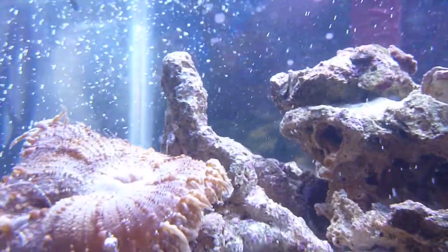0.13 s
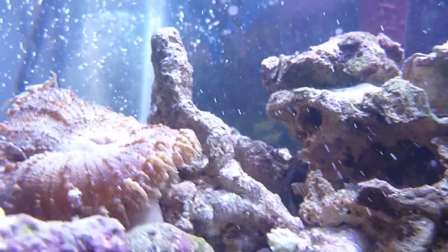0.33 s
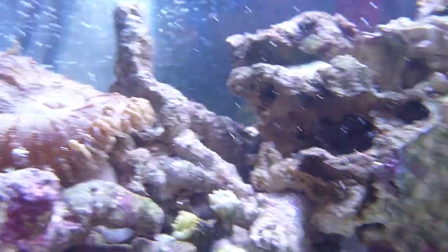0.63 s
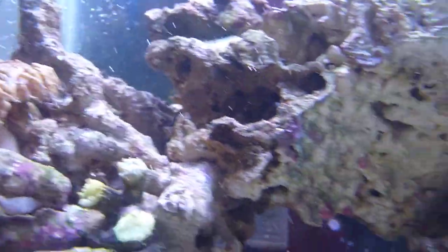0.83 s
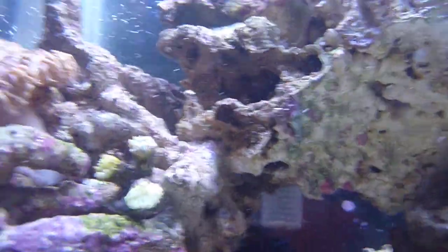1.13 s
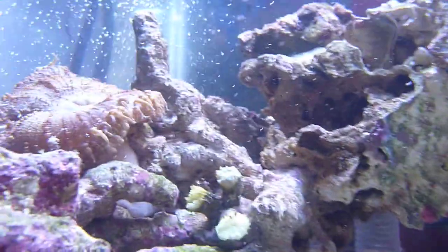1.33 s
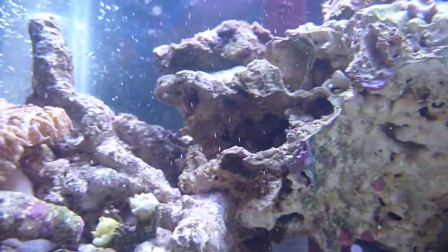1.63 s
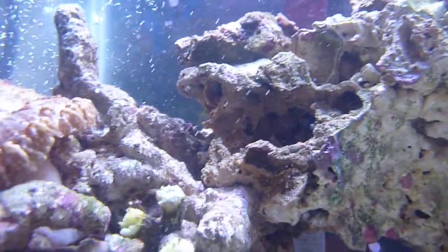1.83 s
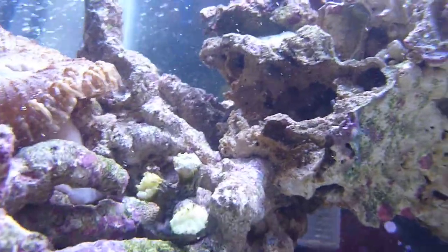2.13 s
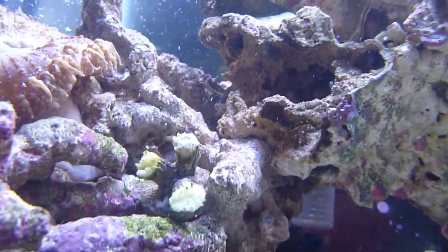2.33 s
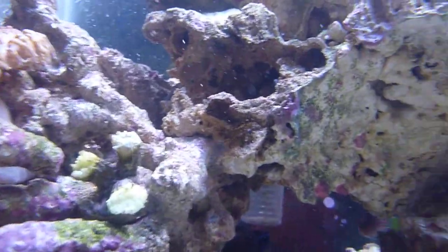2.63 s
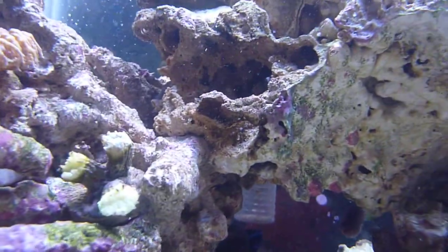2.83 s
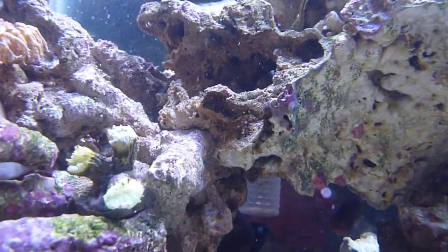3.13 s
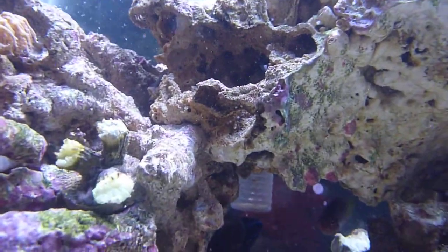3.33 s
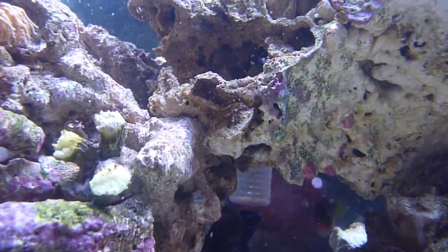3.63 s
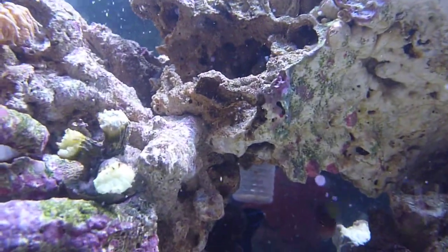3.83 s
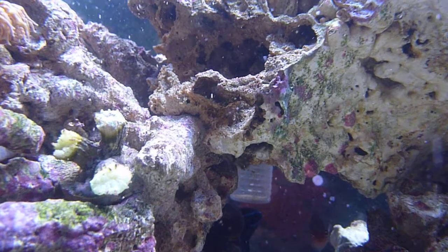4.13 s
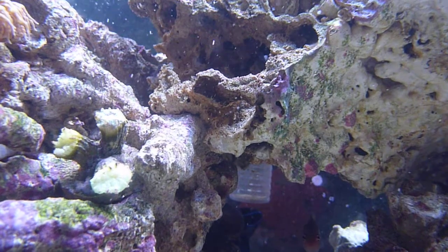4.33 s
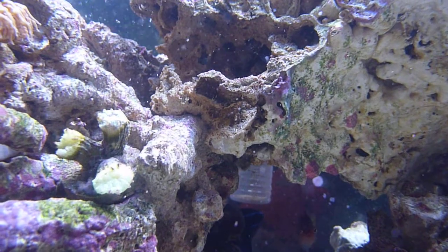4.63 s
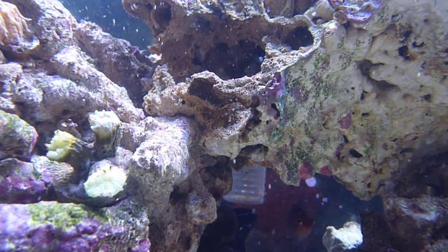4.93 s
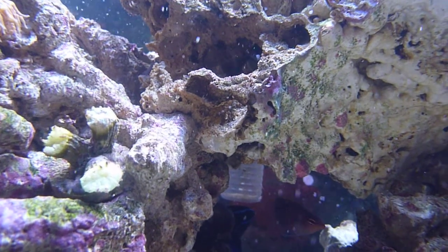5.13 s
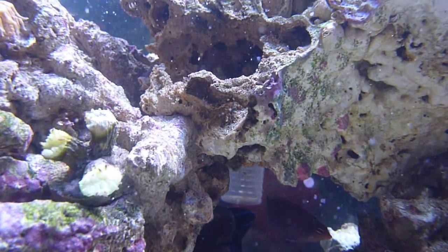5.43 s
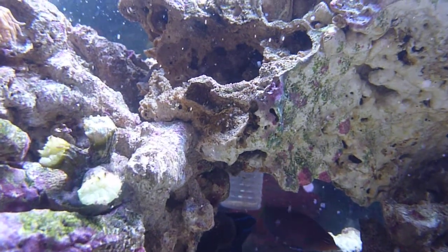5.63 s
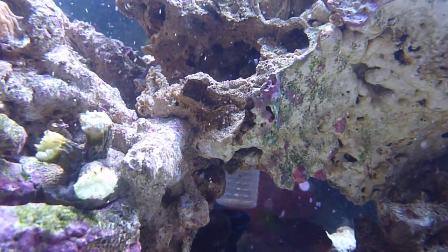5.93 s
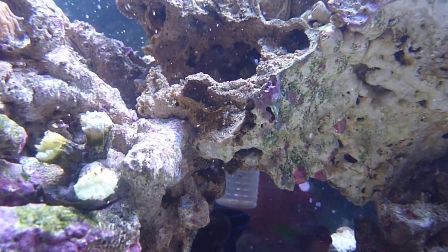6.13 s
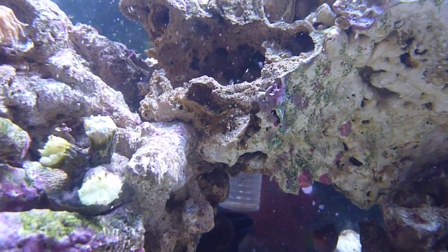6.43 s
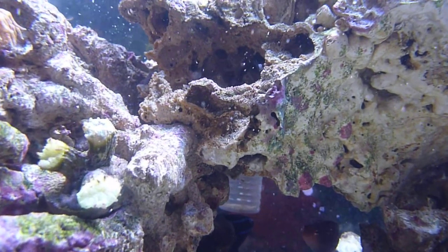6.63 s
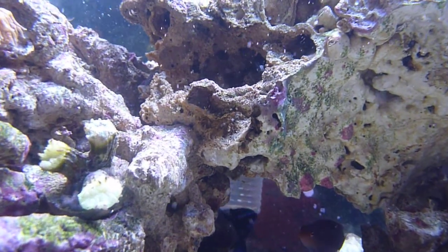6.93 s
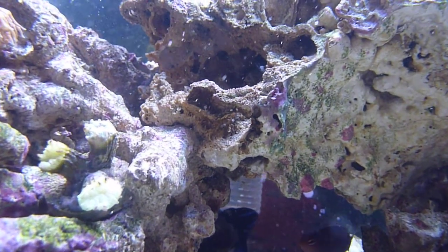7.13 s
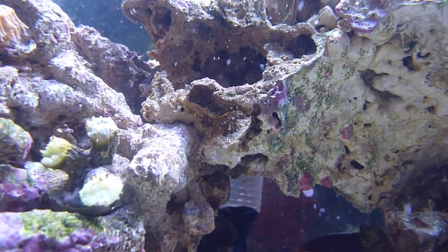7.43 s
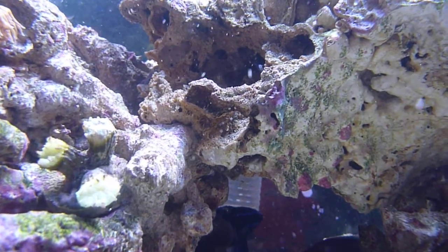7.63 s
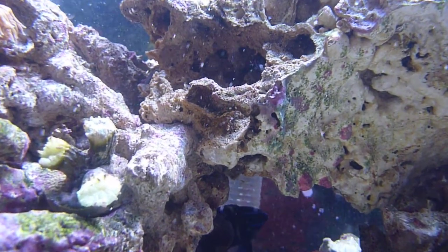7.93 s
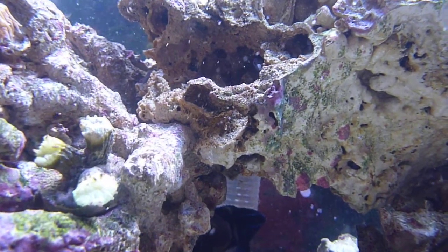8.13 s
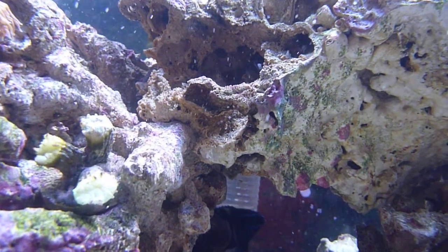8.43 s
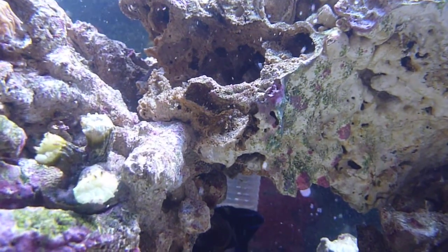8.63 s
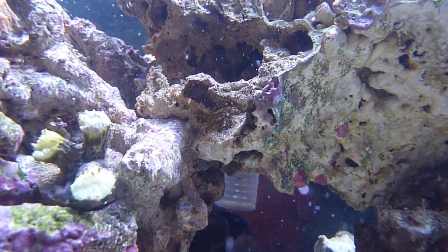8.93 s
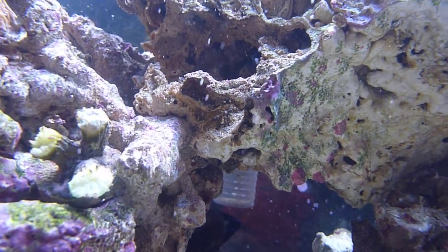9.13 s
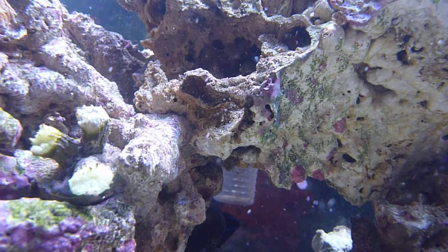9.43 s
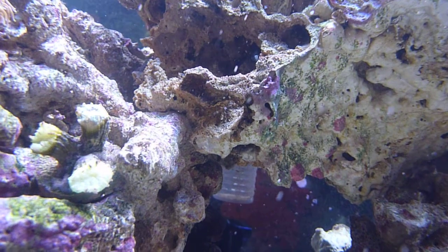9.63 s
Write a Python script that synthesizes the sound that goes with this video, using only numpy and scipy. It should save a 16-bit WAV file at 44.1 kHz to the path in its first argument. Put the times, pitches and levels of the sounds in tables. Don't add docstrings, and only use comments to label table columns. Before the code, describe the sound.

Throughout about 9.8 seconds, bubbles gurgle close by in a drain pipe: dense, wet fizzing around one to two and a half kilohertz, a hollow resonance wandering in pitch, and short rounded plops, strongest near 3.9, 4.3, 6.45 and 9.5. Pumps hum low and steadily beneath a soft, dull wash. From 0 to 2.7 a tiny lens motor whirrs in fast fluttering pulses, winds down in six quick twitches until about 3.1, then twitches grittily at irregular intervals from 3.6. A palm rubs until 1.6; fingers knock at 0.6, then harder with piercing clicks at 1.05 to 1.3. A lone hard knock lands at 2.5, a faint slide at 3.3, two knocks at 6.0 and 6.2, and one at 8.5. Tiny bright ticks are scattered throughout. The sealed microphone sounds close and muffled; loud hits briefly duck everything.

```python
import sys
import numpy as np
from scipy import signal
from scipy.fft import rfft, irfft
from scipy.io import wavfile
from scipy.ndimage import uniform_filter1d

SR = 44100
rng = np.random.default_rng(int(sys.argv[2]) if len(sys.argv) > 2 else 0)


def wav_record(signal):
    frames = np.transpose(np.atleast_2d(signal))
    bounded = np.clip(frames, -1, 1)
    quanta = np.round(bounded * 32767).astype(np.int16)
    wavfile.write(sys.argv[1], SR, quanta)


def nominal_scale(level):
    x = np.asarray(level, float) / 20
    return 10 ** x


N = 430857
LENGTH_S = N / SR
TIME = np.arange(N) / SR

# [t/s, peak level/dB, f/Hz]
LARGE_BUBBLES = [(0.0463, -20, 1710), (0.4242, -22, 1235), (0.5448, -20.5, 1325), (0.5713, -19.5, 1430),
                 (0.6419, -13.5, 1397), (2.0496, -12, 1820), (2.0508, -10, 1807), (2.092, -21.5, 1285),
                 (2.1958, -24.5, 1810), (2.1981, -11, 1696), (2.8346, -28, 1280), (3.9094, -17.5, 1620),
                 (3.9127, -5, 1660), (4.0499, -18.5, 1696), (5.2913, -16, 1595), (0.16, -20, 1550),
                 (6.0511, -12, 1720), (6.0532, -19.5, 1960), (6.4285, -20, 1660), (6.4557, -13.5, 1797),
                 (6.4571, -4.5, 1787), (6.948, -9.5, 1444), (7.2294, -13, 1505), (7.98, -20.5, 1580),
                 (8.6077, -16, 1270), (8.6334, -17.5, 1740), (8.7293, -15.5, 1765), (9.0274, -18, 1760),
                 (9.0351, -10.5, 1670), (9.5434, -20.5, 1490),
                 (0.328, -12.5, 1867), (0.6508, -18.5, 2100), (1.501, -18, 2370), (1.5175, -13, 2260),
                (2.0185, -16.5, 2270), (2.6237, -17, 1880), (2.8337, -19.5, 2090), (3.1124, -9.5, 2410),
                (3.1567, -16.5, 2440), (3.5326, -14, 1920), (3.6337, -14.5, 2164), (4.179, -18, 2160),
                (4.2627, -14.5, 2170), (4.288, -6, 1900), (5.1424, -15.5, 2154), (5.1681, -15.5, 2520),
                (5.2937, -7.5, 1940), (5.7507, -12.5, 2064), (5.9082, -15.5, 2390), (6.01, -12, 1965),
                (6.99, -12, 2235), (7.088, -16, 2154), (7.387, -18.5, 1910), (7.755, -19, 1990),
                (8.297, -16.5, 2360), (8.607, -15.5, 2050), (8.7306, -12, 1970), (9.3895, -16.5, 1980),
                (9.5408, -6.5, 2000), (9.6764, -15, 2410)]
TRAINS, TRAIN_GAP_S, TRAIN_STEP_HZ = 55, 0.018, 160
MIDDLING_DB, MIDDLING_SPREAD_DB, MIDDLING_LOW_HZ, MIDDLING_HIGH_HZ = -23.5, 2.5, 1208, 2590
TINY_COUNT, TINY_DB, TINY_LOW_HZ = 45, -52, 2900

# [t/s, f/Hz]
AIR_COLUMN = [(0, 1242), (.5, 1227), (.8, 1433), (1.25, 1263), (2.75, 1340), (3.05, 1201), (4.0, 1380),
              (4.4, 1089), (5.2, 1402), (5.7, 1261), (6.05, 1426), (6.55, 1335), (7.25, 1175), (7.55, 1302),
              (8.25, 1132), (8.5, 1255), (9.45, 1071), (9.77, 1197)]
# [t/s, level/dB]
GURGLE_LEVEL = [(0.0, -38.5), (0.65, -30.5), (1.03, -37), (2.56, -36.5), (2.75, -32.5), (3.15, -40),
                (3.56, -32.5), (4.57, -38.5), (5.22, -34.5), (5.44, -40.5), (6.17, -33.5), (6.61, -33.5),
                (7.48, -40.5), (7.94, -34.5), (8.22, -42), (8.82, -35), (9.77, -37.5)]
# [f/Hz, level/dB per Hz]
FIZZ_SPECTRUM = [(530, -47), (900, -17.5), (1280, -17.5), (1560, -11), (1700, -3.5), (1970, 0.5),
                 (2450, -4), (2930, -17), (3400, -46), (4420, -72), (7480, -120)]
FIZZ_PITCHES, COLUMN_T60_S = 36, 0.055
WHINE_HZ, WHINE_DB = 2991, -73

# [multiple of step rate, level going out/dB, level coming back/dB]
WHIRR = [(1, -50, -50.5), (2, -42, -49.5), (3, -50, -40.5), (4, -53.5, -45), (6, -59.5, -85.5),
         (7, -74.5, -64.5)]
# [f/Hz, level/dB per Hz]
GEAR_SPECTRUM = [(400, -4), (700, -13), (900, 0.5), (1300, 0), (2400, 0.5), (3200, -26), (5000, -29.5),
                 (7500, -41)]
FRAME_S, STEP_HZ, HUNT_END_S = 1 / 29.97, 479.2, 2.72
WIND_DOWN_S, WIND_DOWN_GAP_S, WIND_DOWN_DB = 2.733, 0.057, -43
FULL_DB, FULL_LENGTH_S, LIGHT_LENGTH_S = -41, 0.039, 0.028
FULL_TWITCHES = [3.563, 3.642, 3.764, 3.832, 4.387, 4.602, 4.711, 4.908, 5.046, 5.133, 5.277, 5.386, 5.582,
                 5.726, 5.967, 6.101, 6.308, 6.497, 6.961, 7.125, 7.532, 7.796, 7.866, 8.035, 8.166, 8.402,
                 8.587, 8.76, 9.145]
# [t/s, peak level/dB]
LIGHT_TWITCHES = [(3.903, -44), (4.294, -43), (4.65, -45), (5.234, -40), (5.673, -40), (5.926, -41.5),
                  (6.167, -51), (6.531, -48), (6.619, -42), (6.762, -43), (7.21, -48), (7.279, -48),
                  (7.376, -40.5), (7.475, -45), (7.755, -41.5), (8.26, -62), (8.336, -48), (8.456, -52),
                  (8.893, -42), (9.007, -42), (9.062, -49), (9.321, -48), (9.375, -48), (9.669, -45.5)]

# [t/s, peak level/dB, f/Hz]
KNOCKS = [
    (.572, -12, 536),
    (0.654, -11.5, 437),
    (1.101, -28, 303),
    (1.157, -7, 620),
    (1.2715, -16.5, 480),
    (1.325, -21, 60),
    (2.476, -6, 437),
    (5.988, -14.5, 379),
    (6.173, -7.5, 474),
    (8.4651, -16.5, 265),
]
# [t/s, peak level/dB, hardness as f/Hz]
CLICKS = [(0.572, -15, 2320), (.655, -26, 2260), (1.058, 11, 12000), (1.102, -14, 1800), (1.1578, 0, 1940),
          (1.1586, -4.5, 1940), (1.1768, 11, 12100), (1.2714, -10.5, 2080), (5.991, -30, 1700),
          (6.172, -10, 1680), (8.466, -15.5, 1500)]
# [f/Hz, level/dB, t60/s]
HOUSING_MODES = [(480, -11, 0.0099), (1400, -10.5, 0.003), (1994, 5.5, 0.0031), (3500, -3, 0.0031),
                 (5360, -8.5, 0.0036), (7670, -0.5, 0.0014), (4080, -6.5, 0.00089), (7330, -9.5, 0.0018)]
WALL_MODES_HZ = 4000

# [t/s, peak level/dB, f/Hz]
TICKS = [(0.5294, -37, 3720), (0.822, -45, 3400), (1.3848, -42, 4000), (1.649, -39, 3280),
         (1.7399, -32.5, 3300), (2.834, -35, 3630), (2.9622, -44, 3340), (3.2685, -44, 3500),
         (3.912, -36.5, 3430), (5.2944, -61, 3280), (6.547, -40, 4800), (6.8271, -45, 4650),
         (7.1432, -44, 4770), (7.452, -44, 4840), (7.9716, -48, 4350), (8.1783, -30, 4600),
         (8.759, -45, 4800), (9.545, -38, 3470), (9.631, -48, 5770)]
TICK_T60_S = 0.007

# [t/s, level/dB, length/s]
SLIDES = [
    (0.567, -44.5, 0.064),
    (1.322, -44.5, .06),
    (3.257, -46.5, 0.23),
    (8.722, -66, .08),
]
# [t/s, level/dB]
GRIP = [
    (0, -43.5),
    (.45, -40.5),
    (.7, -62),
    (1.2, -47),
    (1.45, -48),
    (1.7, -76.5),
    (9.77, -69),
]
# [f/Hz, level/dB per Hz]
PALM_SPECTRUM = [(150, -11.0), (300, 6.0), (500, -2.5), (800, -19.5)]
SLIDE_SPECTRUM = [(1500, -6.5), (2600, 10.5), (3600, -11.5), (7500, -22.5)]

# [multiple of mains, rms level/dB, phase/rad]
HUM = [(1, -41.5, -1.5), (2, -30, 2.0), (3, -40, 0.0), (4, -50, -2.0), (6, -45, 1.7)]
# [f/Hz, level/dB per Hz]
WASH_SPECTRUM = [(45, -18), (80, -17.5), (100, -4.5), (150, -6.5), (229, -8.5), (330, -10.5), (430, -17),
                 (600, -26.5), (860, -32), (1150, -24), (2400, -28), (3200, -44), (7300, -57),
                 (8600, -96.5)]
MAINS_HZ, HUM_DB, WASH_DB = 60.011, -2, -37.5

# [t/s, level/dB]
GAIN = [(0, 4), (.3, 3.5), (.6, 2), (1.3, 2), (2.5, 2), (5, 1.43), (7.5, 3), (9.77, 2.5)]
NOTCH_HZ, NOTCH_WIDTH_HZ, MIC_CUT_HZ, BAND_EDGE_HZ, CLIP = 5420, 380, 7600, 8200, 0.72


def rms_one(x):
    return x / np.sqrt(np.mean(x ** 2) + 1e-20)


def in_time(rows):
    s, *columns = np.transpose(rows)
    return [np.interp(TIME, s, c) for c in columns]


def at_hz(points, hz):
    f, db = np.transpose(points)
    return np.interp(np.log(hz), np.log(f), db, left=db[0] - 22, right=-99)


def coloured(points):
    hz = np.maximum(np.arange(N // 2 + 1) * SR / N, 1)
    white = rfft(rng.standard_normal(N))
    return rms_one(irfft(white * nominal_scale(at_hz(points, hz)), N))


def drift(rate):
    r = np.exp(-80 * np.pi * rate / SR)
    slow = signal.lfilter([1], [1, -2 * r, r * r], rng.standard_normal(N // 40 + 2002))[2000:]
    return np.interp(np.arange(N) / 40, np.arange(len(slow)), rms_one(slow))


def ring(clicks, hz, t60):
    r, w = nominal_scale(-60 / (t60 * SR)), 2 * np.pi * hz / SR
    return signal.lfilter([0, np.sin(w)], [1, -2 * r * np.cos(w), r * r], clicks + 1e-18)


def sine(hz, t):
    return np.sin(2 * np.pi * hz * t)


def add(out, s, sound):
    i = round(s * SR)
    out[i:i + len(sound)] += sound[:N - i]


def puff(length_s):
    return np.hanning(max(round(length_s * SR), 100))


def grains(per_s, spread_db):
    sizes = nominal_scale(spread_db * np.minimum(rng.exponential(1, N), 4)) * rng.choice([-1, 1], N)
    return sizes * (rng.random(N) < per_s / SR)


def bubble_rows():
    start, first, slope = np.repeat(rng.random((TRAINS, 3)), 3, axis=0).T
    place = np.tile(np.arange(3), TRAINS)
    late, size, off = rng.random((3 * TRAINS, 3)).T
    when = start * 0.99 + (place + late) * TRAIN_GAP_S / LENGTH_S
    walk_hz = TRAIN_STEP_HZ * ((2 * slope - 1) * (place - 1) + off - 0.5)
    hz = MIDDLING_LOW_HZ + (MIDDLING_HIGH_HZ - MIDDLING_LOW_HZ) * first + walk_hz
    db = MIDDLING_DB + MIDDLING_SPREAD_DB * np.log(size)
    middling = zip(0.01 + when * (LENGTH_S - 0.02), db, hz)
    when, size, pitch = rng.random((TINY_COUNT, 3)).T
    tiny_hz = TINY_LOW_HZ * 1.55 ** pitch
    tiny = zip(0.01 + when * (LENGTH_S - 0.02), TINY_DB + 4 * np.log(size), tiny_hz)
    return LARGE_BUBBLES + list(middling) + list(tiny)


def large_bubbles(rows):
    out, t = np.zeros(N), np.arange(4000) / SR
    swell = np.sin(np.pi / 2 * np.minimum(t / 0.0025, 1)) ** 2
    chances = rng.standard_normal((len(rows), 4))
    for (s, db, hz), (detune, phase, lasting, glide) in zip(rows, chances):
        t60 = 0.037 * nominal_scale(0.047 * (db + 15.5) + 2.1 * lasting)
        dying = nominal_scale(-60 * (t / t60) ** 1.5)
        tone = sine(hz * (1 + (0.3 + 1.0 * glide) * t), t)
        neighbour = 0.45 * np.sin(2 * np.pi * hz * (1 + 0.06 * detune) * t + phase)
        add(out, s - 0.001, nominal_scale(db - 4.1) * swell * dying * (tone + neighbour))
    return out


def small_bubbles(clicks, jolts):
    dealt = rng.integers(0, FIZZ_PITCHES, N)
    share = rng.standard_normal((FIZZ_PITCHES, 64)) ** 3 / 4
    fizz, at = np.zeros(N), np.flatnonzero(jolts)
    for k, hz in enumerate(np.geomspace(1050, 2850, FIZZ_PITCHES)):
        struck = clicks * (dealt == k)
        struck[at] += 0.78 * jolts[at] * share[k][np.arange(len(at)) % 64]
        swelling = ring(struck, hz, t60=85 / hz)
        fizz += nominal_scale(at_hz(FIZZ_SPECTRUM, hz)) * hz * ring(swelling, hz, t60=22 / hz)
    return fizz


def air_column(shakes):
    column_hz, = in_time(AIR_COLUMN)
    turn = np.exp(2j * np.pi * np.cumsum(column_hz) / SR)
    r = nominal_scale(-60 / (COLUMN_T60_S * SR))
    shaken = signal.lfilter([1], [1, -r], shakes * np.conj(turn))
    return np.imag(signal.lfilter([1], [1, -r ** 6], shaken) * turn)


def gurgle(bubbles):
    level_db, = in_time(GURGLE_LEVEL)
    clumps = nominal_scale(4.0 * drift(12))
    clicks = grains(450 * clumps, spread_db=4.2)
    jolts = grains(70 * clumps, spread_db=2.5)
    for s, db, hz in bubbles:
        jolts[round(s * SR)] = 1.8 * nominal_scale(0.68 * (db + 16.5))
    fizz = small_bubbles(clicks, jolts)
    column = air_column(grains(250 * clumps, spread_db=3.0) + 5.1 * jolts)
    whine = nominal_scale(WHINE_DB + 1.7 * drift(12)) * sine(WHINE_HZ, TIME)
    water = rms_one(fizz) + nominal_scale(-4.5) * rms_one(column)
    return nominal_scale(level_db - 4.5) * water + whine


def twitch_rows():
    winding = [(WIND_DOWN_S + k * WIND_DOWN_GAP_S, WIND_DOWN_DB, FULL_LENGTH_S) for k in range(6)]
    full = [(s, FULL_DB, FULL_LENGTH_S) for s in FULL_TWITCHES]
    light = [(s, db, LIGHT_LENGTH_S) for s, db in LIGHT_TWITCHES]
    return winding + full + light


def lens_motor():
    frame = np.floor((TIME + 0.0033) / FRAME_S).astype(int)
    hunting = TIME < HUNT_END_S
    out_gate, back_gate = [uniform_filter1d(1. * hunting * (frame % 4 == k), size=90) for k in (0, 2)]
    whirr = np.zeros(N)
    for k, out_db, back_db in WHIRR:
        level = (nominal_scale(out_db) * out_gate + nominal_scale(back_db) * back_gate) * nominal_scale(1.5 * drift(5.8))
        whirr += level * np.sqrt(2) * np.sin(2 * np.pi * k * STEP_HZ * TIME + k * k)
    effort = nominal_scale(-43.5) * (out_gate + back_gate)
    for s, db, length_s in twitch_rows():
        add(effort, s - 0.003, nominal_scale(db + 6.0) * np.sqrt(puff(length_s)))
    return whirr + effort * nominal_scale(3.1 * drift(150)) * coloured(GEAR_SPECTRUM)


def finger_knocks():
    out, t = np.zeros(N), np.arange(3000) / SR
    for s, db, hz in KNOCKS:
        push = (t * hz * 1.65) * np.exp(1 - t * hz * 2.08) / 3.44
        add(out, s, nominal_scale(db + 10.0) * sine(hz, t) * push)
    return out


def housing_clicks():
    out, t = np.zeros(N), np.arange(3000) / SR
    body = np.zeros(len(t))
    for hz, db, t60 in HOUSING_MODES:
        body += np.sign(WALL_MODES_HZ - hz) * nominal_scale(db) * sine(hz, t) * nominal_scale(-60 * t / t60)
    for s, db, hard_hz in CLICKS:
        softness = signal.butter(4, min(hard_hz, 18000), fs=SR, output="sos")
        add(out, s, nominal_scale(db) * signal.sosfilt(softness, body))
    return out


def ticks():
    out, t = np.zeros(N), np.arange(500) / SR
    shape = (1 - np.exp(-t / 0.000087)) * nominal_scale(-60 * t / TICK_T60_S)
    for (s, db, hz), noise in zip(TICKS, rng.standard_normal((len(TICKS), 500))):
        skirt = 0.064 * np.diff(noise, prepend=0)
        add(out, s, nominal_scale(db + 1.0) * (sine(hz, t) + skirt) * shape)
    return out


def rustle():
    slide = np.zeros(N)
    for s, db, length_s in SLIDES:
        add(slide, s, nominal_scale(db) * puff(length_s))
    grip_db, = in_time(GRIP)
    rub = nominal_scale(grip_db + 1.6 * drift(25)) * coloured(PALM_SPECTRUM)
    return rub + slide * nominal_scale(2.5 * drift(60)) * coloured(SLIDE_SPECTRUM)


def pumps():
    hum = np.zeros(N)
    for k, db, phase in HUM:
        flutter = nominal_scale(db + 0.098 * drift(15.0))
        hum += np.sqrt(2) * flutter * np.cos(2 * np.pi * k * MAINS_HZ * TIME + phase)
    wash = nominal_scale(WASH_DB + 1.78 * drift(5.2)) * coloured(WASH_SPECTRUM)
    return nominal_scale(HUM_DB) * hum + wash


def scene():
    bubbles = bubble_rows()
    water = large_bubbles(bubbles) + gurgle(bubbles) + ticks() + pumps()
    touched = lens_motor() + finger_knocks() + rustle()
    notch = signal.iirnotch(NOTCH_HZ, NOTCH_HZ / NOTCH_WIDTH_HZ, SR)
    return (signal.lfilter(*notch, water + touched) + housing_clicks())[None]


def gain_control(x):
    over_db = np.maximum(10 * np.log10(uniform_filter1d(x ** 2, size=700) + 1e-12) + 23, 0)
    held_db = np.maximum.accumulate(over_db + 25 * TIME) - 25 * TIME
    duck_db = signal.lfilter([0.003], [1, -0.997], held_db)
    gain_db, = in_time(GAIN)
    return x * nominal_scale(gain_db - 0.17 * duck_db)


def roll_off(x):
    return signal.sosfilt(signal.butter(12, 16540, fs=SR, output="sos"), x)


def record(dry):
    x = signal.sosfilt(signal.butter(8, MIC_CUT_HZ, fs=SR, output="sos"), dry[0])
    x = np.clip(gain_control(x), -CLIP, CLIP)
    x = signal.sosfilt(signal.butter(14, BAND_EDGE_HZ, fs=SR, output="sos"), x)
    x = np.clip(x, -CLIP, CLIP)
    x = x + nominal_scale(-101) * rng.standard_normal(N)
    x = signal.sosfilt(signal.cheby2(10, 40, 16600, fs=SR, output="sos"), x)
    return roll_off(x[None])


dry = scene()
out = record(dry)
wav_record(out)
```